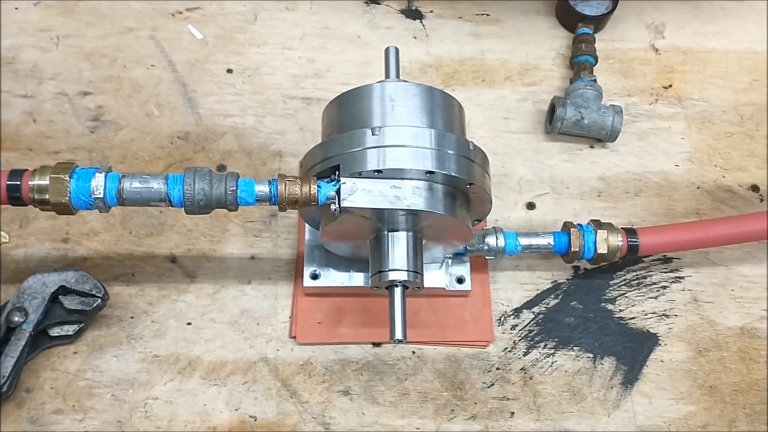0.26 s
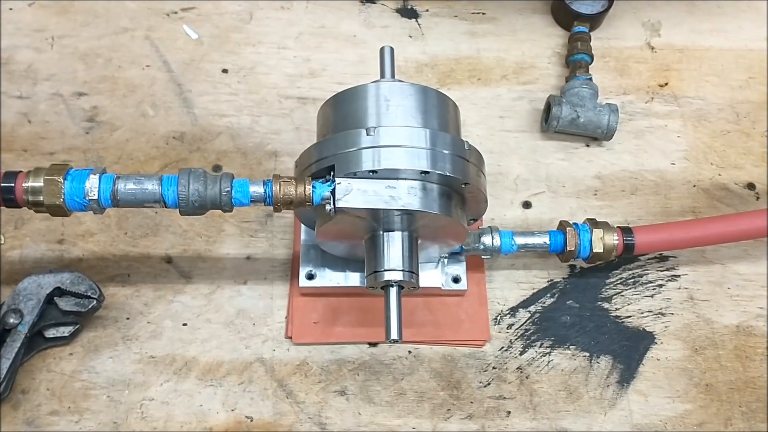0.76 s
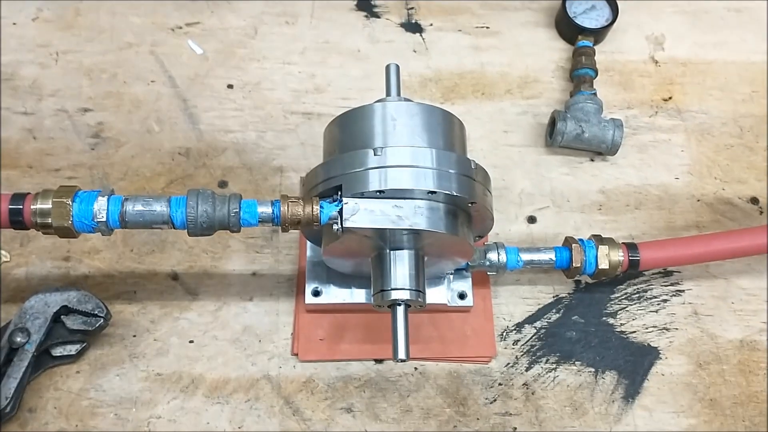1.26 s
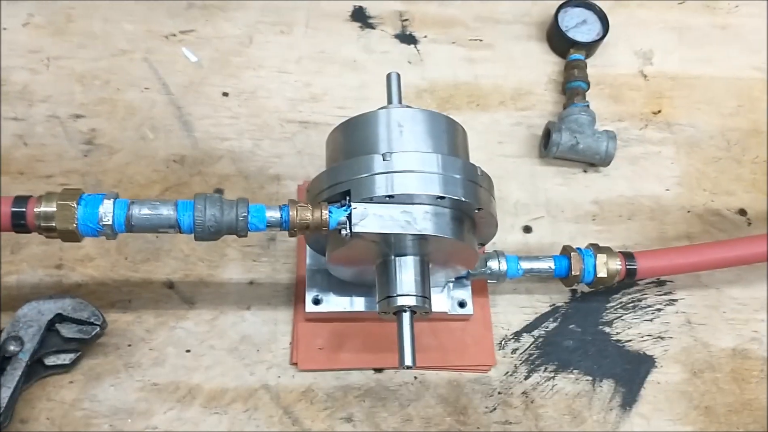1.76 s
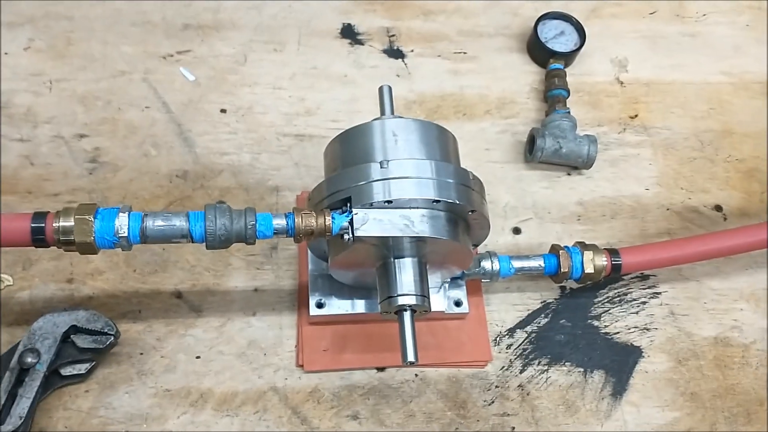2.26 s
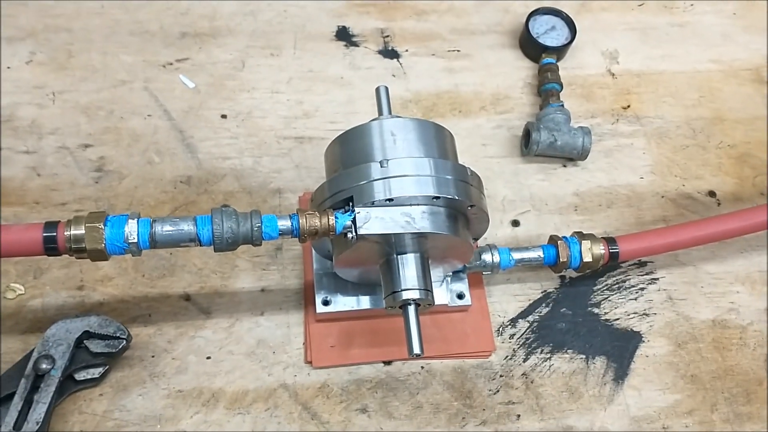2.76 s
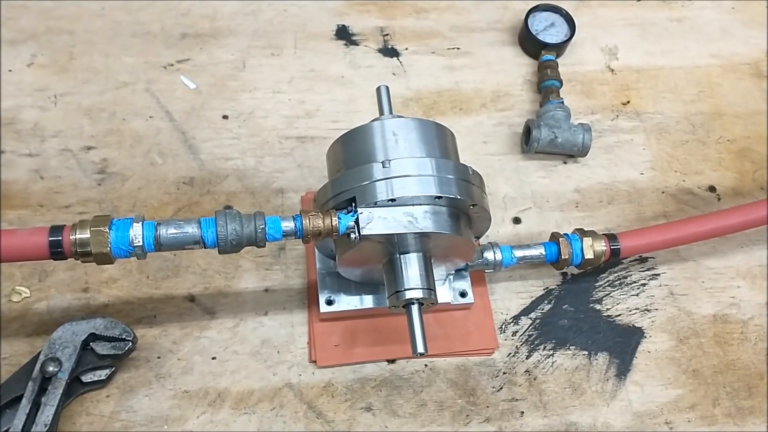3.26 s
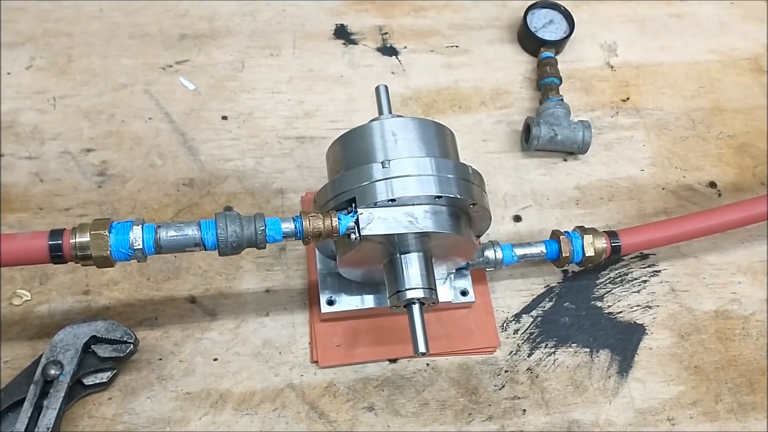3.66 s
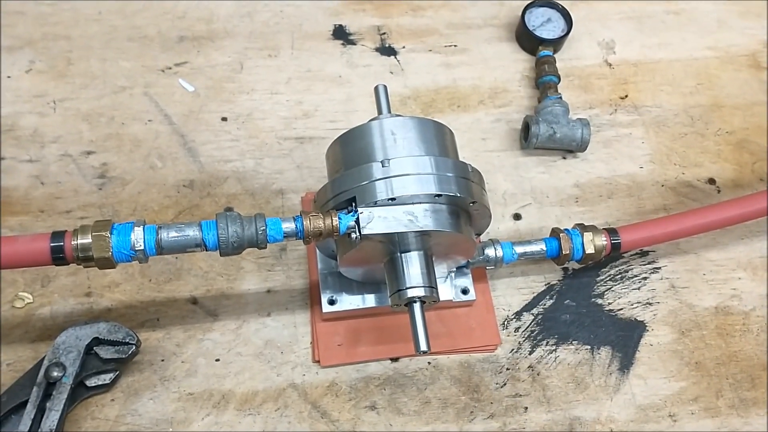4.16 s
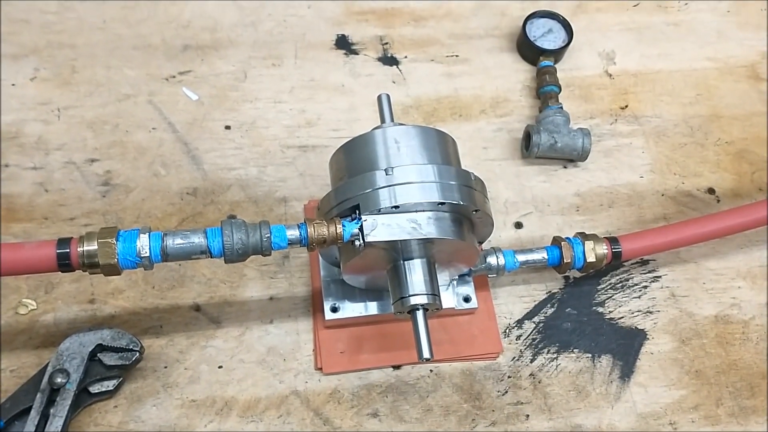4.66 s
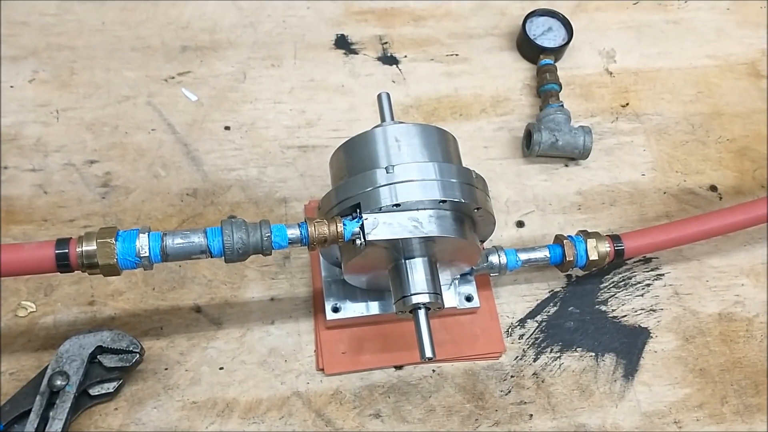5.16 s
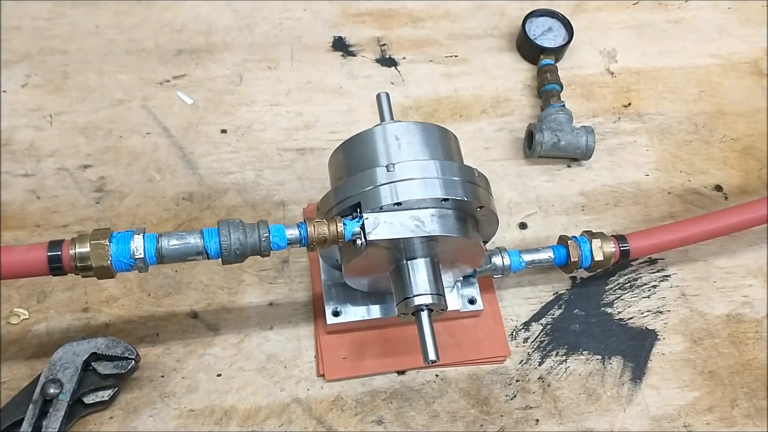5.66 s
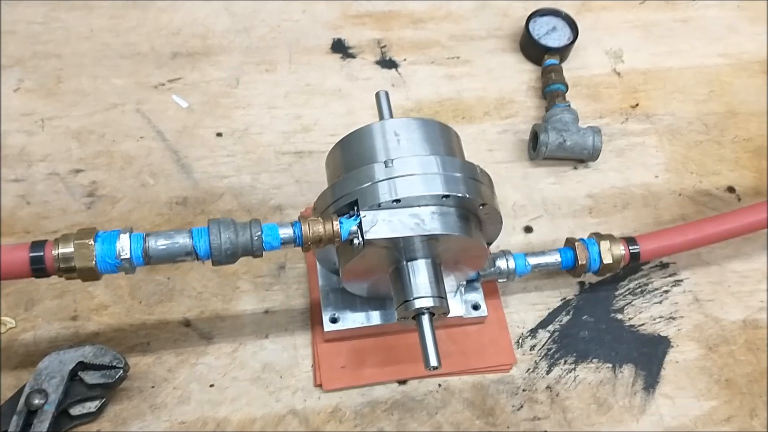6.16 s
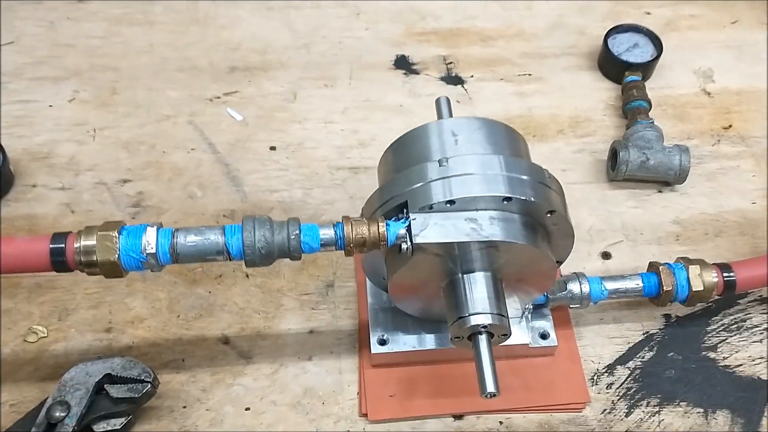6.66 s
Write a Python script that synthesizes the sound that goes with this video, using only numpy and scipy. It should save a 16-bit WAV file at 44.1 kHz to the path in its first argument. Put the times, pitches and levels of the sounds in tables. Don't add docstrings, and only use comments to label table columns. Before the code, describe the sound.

Close up on a workshop bench, a small metal turbine runs on compressed air. A harsh roar gives way within a second to thinner hiss, while a low siren-like hum rises in pitch. A sharp tick and a couple of dull bench bumps interrupt. The air valve closes with a brief high whistle, and the rotor coasts with a steady buzzing, ringing bearing. Handheld stereo pickup at arm's length, dull shop murmur behind.

```python
import sys
import numpy as np
from scipy import signal
from scipy.fft import rfft, irfft, next_fast_len
from scipy.io import wavfile
from scipy.ndimage import uniform_filter1d

SR = 44100
rng = np.random.default_rng(int(sys.argv[2]) if len(sys.argv) > 2 else 0)


def boost(x):
    u = np.asarray(x, float) / 20
    return 10 ** u


def materialize(psi):
    bounded = np.clip(np.atleast_2d(psi).T, -1, 1)
    quanta = np.round(bounded * 32767).astype(np.int16)
    wavfile.write(sys.argv[1], SR, quanta)


N = 304731
T = np.arange(N) / SR
PORTS, BALLS = 8, 5.277
PINCH_S = 3.588

# t/s, speed/(turns per s)
SHAFT_SPEED = [(0.0, 33.35), (0.2, 34.15), (0.45, 35.7), (0.9, 38.2), (1.0, 38.35), (3.0, 43.36),
               (3.55, 44.66), (4.0, 45.12), (6.92, 44.05)]
# multiple of shaft
# rate, level/dB
SHAFT_TONES = [(2, -59.5), (3, -63.5), (4, -79), (8, -73.5), (16, -63.5)]
# speed/(turns per s), width/(turns per s), level/dB
HUM_BENCH = [(32.8, 1.5, -10), (40.3, 2.2, 0)]
# f/Hz, width/Hz, level/dB
SIREN_BENCH = [(271.5, 5.6, -5.5), (289.6, 19.7, -1.5), (324.5, 9.6, -1), (335.8, 10.2, -3.5),
               (344.5, 6.3, -6.5), (356.1, 7.9, -3.5)]


def rotor(angle):
    speed = curves(SHAFT_SPEED)[0]
    driven_db, idle_db = -25.5, -63.5
    closing = np.maximum(T - PINCH_S, 0)
    bleed_db = -21.5 * np.minimum(closing / 0.55, 3) ** 3.5
    driven = boost(driven_db + bleed_db) * rings(SIREN_BENCH, PORTS * speed) ** 1.66
    wobble = 1 + 0.084 * np.cos(angle)
    siren_level = (driven + boost(idle_db)) * boost(0.83 * drift(hz=33.5)) * wobble
    out = siren_level * np.cos(PORTS * angle)
    shudder = ramp(PINCH_S - 0.4, 0.5) * (1 - ramp(PINCH_S + 0.1, 0.7))
    hum = boost(7.5 * shudder) * np.hypot(0.8, rings(HUM_BENCH, speed))
    for k, db in SHAFT_TONES:
        out += hum * boost(db + 0.55 * drift(hz=2.2)) * np.cos(k * angle + k)
    return np.sqrt(2) * out


# t/s, level/dB
SURGE_LEVEL = [(0.0, -23), (0.21, -24.5), (0.838, -31.5), (0.952, -50.5), (1.05, -51.5)]
# f/Hz, level/dB
SURGE_COLOUR = [(30, -54), (65, -12.5), (130, -19), (250, -13.5), (480, -12), (930, -15), (1330, -9.5),
                (2000, -12), (3400, -14), (4800, -17), (7500, -20), (10500, -23.5), (12000, -24.5),
                (15300, -20)]
# f/Hz, width/Hz, level/dB
SURGE_RINGS = [(1283, 47, -2.5), (2080, 86, -0.5), (2453, 28, 2), (2850, 40, 3), (3450, 64, 2),
               (9100, 260, 7.5), (9550, 610, 4), (10900, 390, -4), (14800, 280, -22)]


def surge():
    def colour(hz):
        return boost(read(SURGE_COLOUR, hz)) * (1 + 1.47 * rings(SURGE_RINGS, hz))
    return boost(curves(SURGE_LEVEL, -120)[0] + 4.5) * air(colour, patchy_db=1.5)


# t/s, level/dB, singing of the nozzle cavity/dB
JET_LEVEL = [(0.8, -36, 3), (0.95, -44.5, 0), (1.17, -47, 5.5), (1.3, -44.5, 2.5), (1.7, -43.5, -4.5),
             (2.13, -46, 2), (3.4, -46.5, 4.5), (3.8, -48.5, 0), (3.92, -54.5, -4), (4.02, -70.5, -2),
             (4.35, -100, -3)]
# f/Hz, density/dB
JET_COLOUR = [(50, -21), (70, -8), (130, -6), (250, -6), (600, -2.5), (1000, -8), (2000, -11), (3700, -7.5),
              (4300, -5), (5300, -3), (7300, -7.5), (10000, -10.5), (12000, -14.5), (15000, -17)]
# f/Hz, width/Hz, level/dB
EXHAUST_MODES = [(1153, 126, 2), (1371, 90, 4), (1674, 410, -2)]
# f/Hz, width/Hz, level/dB
CAVITY_MODES = [(8840, 440, -2), (9480, 130, 10)]
# f/Hz, density/dB
LEAK_COLOUR = [(6000, -32), (10000, -18), (10800, -4), (12000, -5), (14600, 1.5), (15200, -2)]


def jet():
    jet_db = curves(JET_LEVEL, -120)[0]
    cavity_db = curves(JET_LEVEL)[1]
    spared_db = 0.46 * np.clip(-47 - jet_db, 0, 40)
    exhaust_db = 0.57 + 5 * ramp(PINCH_S - 0.15, 0.096) + spared_db
    leak_db = 3 + 4 * curves(FACING)[0] + 0.38 * spared_db
    out = boost(7.5) * air(lambda hz: boost(read(JET_COLOUR, hz)), patchy_db=1.12)
    out += boost(exhaust_db + 0.4) * air(lambda hz: rings(EXHAUST_MODES, hz) ** 1.7, patchy_db=0.0)
    out += boost(cavity_db + 2.5) * air(lambda hz: rings(CAVITY_MODES, hz) ** 0.61, patchy_db=-0.3)
    out += boost(leak_db - 1.9) * air(lambda hz: boost(read(LEAK_COLOUR, hz)), patchy_db=1.7)
    return boost(jet_db) * out * ramp(0.8, 0.074)


def valve_whistle():
    start_s, rise_s, hold_s = 3.5, 0.098, 0.19
    level_db, fall_db_per_s = -41, 120
    pitch_hz = 4770 - 90.5 * ramp(start_s, 0.37)
    turn = np.exp(2j * np.pi * np.cumsum(pitch_hz) / SR)
    fading_db = fall_db_per_s * 4 * ramp(start_s + rise_s + hold_s, 4)
    fuzz = [drift(hz=332) for _ in range(4)]
    whistle = paired([fuzz[0] + 1j * fuzz[1], fuzz[2] + 1j * fuzz[3]], 3700)
    return ramp(start_s, rise_s) ** 2 * boost(level_db - fading_db) * (turn * whistle).real


def airflow(angle):
    flutter_db = 0.3 * np.cos(angle) + 0.14 * drift(hz=35) + 0.41 * drift(hz=250)
    return (surge() + jet() + valve_whistle()) * boost(flutter_db)


COAST = 44.6


def tones(angle, pairs, levels_db, body, waver_db):
    speed = curves(SHAFT_SPEED)[0][::64]
    out = np.zeros(N)
    wavers = [drift(hz=2.9) for _ in range(3)]
    for k, ((ball, shift), db) in enumerate(zip(pairs, levels_db)):
        order = BALLS * ball + shift
        swell = rings(body, order * speed) / rings(body, order * COAST)
        swell = np.repeat(swell, 64)[:N] ** 1.3
        waver = np.roll(wavers[k % 3], k * 9000)
        phase = 2 * np.pi * rng.random() + 0.39 * waver
        out += boost(db + waver_db * waver) * swell * np.cos(order * angle + phase)
    return np.sqrt(2) * out


def sidebands(families, levels_db, body):
    pairs, pair_db = [], []
    for (ball, first, last), db in zip(families, levels_db):
        for shift in range(first, last + 1):
            body_gain = rings(body, (BALLS * ball + shift) * COAST)
            pairs.append((ball, shift))
            pair_db.append(db + 24 * np.log10(body_gain))
    return pairs, pair_db


def scraping(angle):
    passes = BALLS * angle / (2 * np.pi)
    grit = irfft(paired(rfft(rng.standard_normal((2, N))), np.fft.rfftfreq(N, 1 / SR)), N)
    throb_db = 0.5 * np.cos((BALLS % 1) * angle)
    turning_db = 1.7 * np.cos(angle) + 0.92 * np.cos(2 * angle)
    return boost(throb_db + turning_db) * (0.48 + np.exp(-(passes % 1) / 0.15)) * grit


# f/Hz, width/Hz, level/dB
CASING_MODES = [(199, 15, 3), (355, 43, 0), (539, 47, 0.5), (627.3, 38, 6), (772, 94, -6), (994, 100, -6.5),
                (1050, 25, -8), (1600, 170, -14), (1770, 90, -1.5), (1930, 61, -7)]
BUZZ_FAMILIES = [(1, 0, 0), (2, 0, 1), (2, 2, 6), (3, -4, -3), (3, -2, -2), (3, -1, 0), (4, -9, -7),
                 (4, -3, -3), (4, 0, 0), (7, -1, 1), (8, 0, 0)]
BUZZ_LEVELS = [-16.5, -10, -14, -16, -10.5, -14.5, -32.5, -11.5, -10, -9, -10]
# f/Hz, width/Hz, level/dB
PLATE_MODES = [(2430, 85, 3), (2345, 60, -1.5), (2555, 75, 2.5), (2940, 150, 0.5)]
PLATE_TONES = [(10, 0), (11, -5), (11, -4), (10, 2), (11, -3), (11, -2), (11, -1), (10, 5), (11, 0),
               (10, 6), (13, -3), (12, 3), (13, -1), (9, 10)]
PLATE_TONE_LEVELS = [-9, -8.5, -12, -41, -6.5, -27.5, -3, -17.5, -5, -21.5, -27, -16.5, -37, -14]
# t/s, level/dB
PLATE_LEVEL = [(0, -56), (1, -45), (2.5, -50.5), (3.6, -47), (4.2, -52), (5.98, -51), (6.12, -46),
               (6.4, -40), (6.92, -40)]
# f/Hz, width/Hz, level/dB
FIZZ_MODES = [(3650, 440, -3), (6000, 500, 0), (8980, 740, 6), (11800, 560, -3)]


def bearing(angle):
    scrape = scraping(angle)
    speed = curves(SHAFT_SPEED)[0]
    coasting_s = np.maximum(T - PINCH_S - 0.6, 0)
    buzz_db = -45 + 1 * (speed - COAST) - 0.84 * coasting_s
    families = sidebands(BUZZ_FAMILIES, BUZZ_LEVELS, CASING_MODES)
    buzz = tones(angle, *families, CASING_MODES, waver_db=2.84)
    buzz = buzz + boost(-8.0) * evened(shaped(scrape, lambda hz: rings(CASING_MODES[1:], hz)))
    beat = 0.13 * ramp(PINCH_S + 0.82, 1.4) * np.cos((BALLS % 1) * angle)
    buzz = buzz * (1 + beat)

    ring_db = curves(PLATE_LEVEL)[0]
    ring = tones(angle, PLATE_TONES, PLATE_TONE_LEVELS, PLATE_MODES, waver_db=3.0)
    ring = ring * (0.3 + 0.7 * ramp(PINCH_S, 0.6))
    ring = ring + boost(-2.0) * evened(shaped(scrape, lambda hz: rings(PLATE_MODES, hz) ** 1.37))
    side_db = 0.19 * (ring_db + 44) * np.array([[1], [-1]])

    fizz_db = -74 + 0.2 * (ring_db + 50)
    fizz = evened(shaped(scrape, lambda hz: rings(FIZZ_MODES, hz) ** 2.2))
    return boost(buzz_db) * buzz + boost(ring_db + side_db) * ring + boost(fizz_db) * fizz


# f/Hz, width/Hz, level/dB
BLOOM_MODES = [
    (204.3, 19.6, -49),
    (632.7, 28, -41.5),
]


def bloom(angle):
    speed = curves(SHAFT_SPEED)[0]
    out = boost(-73) * ramp(PINCH_S + 0.2, 0.3) * np.cos(angle)
    for k, (hz, width, db) in zip((BALLS, 3 * BALLS), BLOOM_MODES):
        out = out + boost(db) * rings([(hz, width, 0)], k * speed) ** 1.9 * np.cos(k * angle)
    return np.sqrt(2) * out


# t/s, level/dB, f/Hz, t60/s
BENCH_KNOCKS = [
    (2.632, -17.5, 250, 0.082),
    (2.633, -27, 126, 0.089),
    (2.694, -20.5, 239, 0.058),
    (2.756, -37, 245, 0.18),
]


def knocks():
    out = np.zeros(N)
    for s, db, hz, t60 in BENCH_KNOCKS:
        u = np.maximum(T - s, 0)
        onset = 1 - np.exp(-u / 0.013)
        out += boost(db - 60 * u / (1.26 * t60)) * onset * np.sin(2 * np.pi * hz * u)
    return out


# t/s, level/dB, centre f/Hz, width/Hz, left minus right level/dB
CAMERA_TICKS = [
    (1.7373, -17, 9000, 12000, -12),
    (1.7382, -10, 3200, 5500, -12),
    (6.389, -47, 11000, 9000, -10),
    (6.474, -54, 11000, 8000, -8),
    (6.553, -55, 12000, 8000, -4),
    (4.27, -58, 11000, 8000, -6),
    (4.96, -58, 11000, 8000, -6),
    (6.05, -58, 8000, 9000, -3),
]


def ticks():
    out = np.zeros((2, N))
    n = np.arange(200)
    for s, db, hz, width, pan_db in CAMERA_TICKS:
        click = np.zeros(N)
        burst = rng.standard_normal(200) * np.exp(-n / 22) * np.minimum(n / 8, 1)
        click[round(s * SR):][:200] = burst
        click = shaped(click, lambda f: rings([(hz, width, 0)], f))
        out += boost(db + np.array([[pan_db], [0]])) * click / abs(click).max()
    return out


# f/Hz, density/dB
SHOP_COLOUR = [(25, -36), (55, -32), (70, -14), (150, -6), (400, -1.5), (1500, -3.5), (2800, -7),
               (3700, -13.5), (4100, -36), (5000, -31), (8000, -32.5), (12000, -37), (14500, -38),
               (15800, -52)]


def shop_murmur():
    return boost(-49.5) * air(lambda hz: boost(read(SHOP_COLOUR, hz)), patchy_db=0.26)


# f/Hz, lead/rad
PORT_LEAD = [(100, 0.16), (300, 0.03), (700, 0.89), (1400, 0.34), (2800, 2.17), (4100, 2.22), (6800, 2.62),
             (9000, 0.79), (12000, 1.48)]


def workshop(x):
    n = np.arange(4096)
    echoes = rng.standard_normal((2, 4096)) * boost(-60 * n / SR / 0.072)
    highpass = signal.butter(2, 3000, "high", fs=SR)
    echoes = signal.lfilter(*highpass, echoes / np.linalg.norm(echoes[0]))
    x = x + boost(-7.0) * signal.oaconvolve(x, echoes, axes=1)[:, :N]
    return shaped(x, lambda hz: np.exp(0.5j * np.outer([1, -1], read(PORT_LEAD, hz))))


# f/Hz, likeness/(0-1)
PORT_LIKENESS = [(30, 0.45), (100, 0.84), (300, 0.67), (700, 0.68), (1500, 0.34), (3500, 0.67),
                 (7000, 0.39), (9000, 0.4), (15000, 0.2)]


def paired(z, hz):
    same = np.clip(read(PORT_LIKENESS, hz), 0, 1)
    return np.array([z[0], same * z[0] + np.sqrt(1 - same ** 2) * z[1]])


def air(colour, patchy_db):
    frames, hz = N // 128 + 5, np.fft.rfftfreq(512, 1 / SR)
    a, b, c, d, patches = rng.standard_normal((frames, 257, 5)).T
    patches = uniform_filter1d(patches, size=8, axis=0)
    patches = evened(uniform_filter1d(patches, size=30, axis=1))
    z = paired([a + 1j * b, c + 1j * d], hz[:, None]) * boost(patchy_db * patches)
    noise = signal.istft(z, nperseg=512, noverlap=384)[1][:, :N]
    return evened(shaped(noise, colour))


def rings(modes, hz):
    return np.sqrt(sum(boost(2 * db) / (1 + (2 * (hz - f) / width) ** 2) for f, width, db in modes))


def drift(hz):
    z = rfft(rng.standard_normal(N))
    return evened(irfft(z / (1 + (np.fft.rfftfreq(N, 1 / SR) / hz) ** 4), N))


def shaped(x, gain):
    size = next_fast_len(N + 8192)
    return irfft(rfft(x, size) * gain(np.fft.rfftfreq(size, 1 / SR)), size)[..., :N]


def evened(x):
    return x / np.sqrt(np.mean(x ** 2) + 1e-20)


def read(points, hz):
    f, value = np.transpose(points)
    return np.interp(np.log(hz + 1), np.log(f + 1), value)


def curves(rows, silent=None):
    s, *columns = np.transpose(rows)
    return [np.interp(T, s, c, silent, silent) for c in columns]


def ramp(from_s, length_s):
    return np.clip((T - from_s) / length_s, 0, 1)


def scene():
    angle = 2 * np.pi * np.cumsum(curves(SHAFT_SPEED)[0]) / SR
    turbine = rotor(angle) + airflow(angle) + bearing(angle) + bloom(angle)
    return workshop(turbine + knocks() + shop_murmur()) + ticks()


def band_limit(x):
    return signal.sosfilt(signal.butter(12, 15830, fs=SR, output="sos"), x)


# t/s, turn/(0-1)
FACING = [(0, 0.32), (1.78, 0.55), (1.95, 1), (5.9, 0.98), (6.15, 0.47), (6.92, 0.45)]
# f/Hz, left minus right level/dB
TILT_AHEAD = [(60, 3), (140, -5), (260, 5), (500, -0.5), (1790, 11.5), (3000, 4), (9810, 4), (15000, -5)]
# f/Hz, left minus right level/dB
TILT_TURNED = [(60, -1.5), (180, 1), (330, -2.5), (770, 2), (1400, -4.5), (4190, 3), (9810, -4), (15000, 0)]


def record(dry):
    hz, t, z = signal.stft(dry, SR, nperseg=512)
    turned = np.interp(t, *np.transpose(FACING))
    tilt_db = np.outer(read(TILT_AHEAD, hz), 1 - turned) + np.outer(read(TILT_TURNED, hz), turned)
    shaded = z * boost(np.array([tilt_db, -tilt_db]) / 2)
    heard = signal.istft(shaded, SR, nperseg=512)[1][:, :N]
    return band_limit(shaped(heard, lambda f: f < 15830))


dry = scene()
out = record(dry)
materialize(out)
```